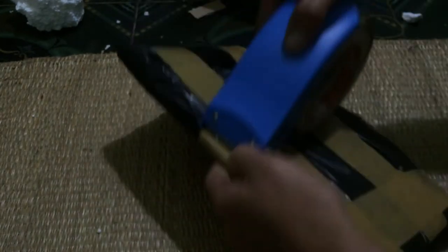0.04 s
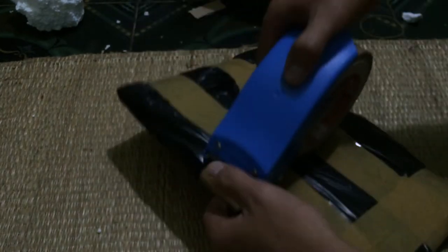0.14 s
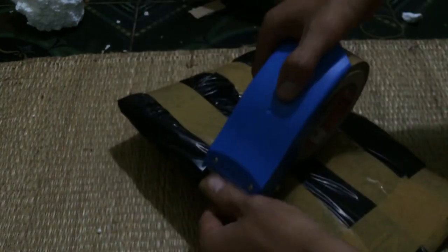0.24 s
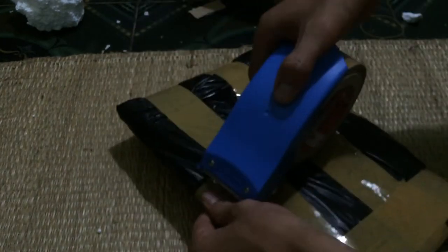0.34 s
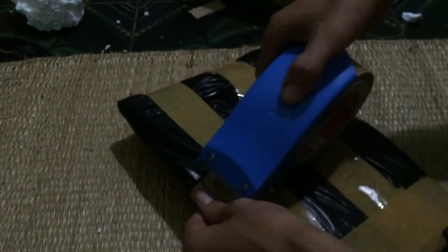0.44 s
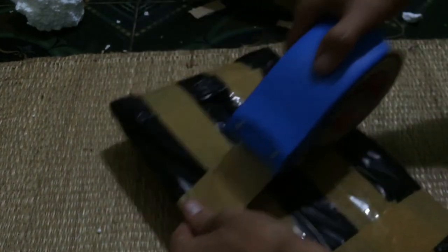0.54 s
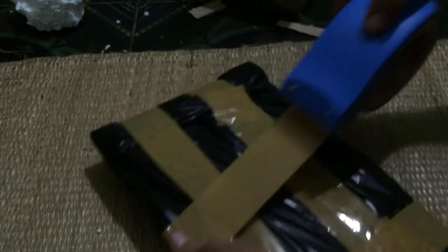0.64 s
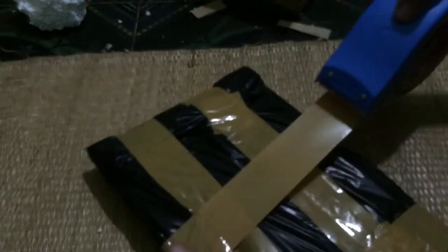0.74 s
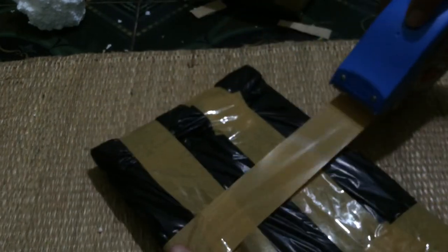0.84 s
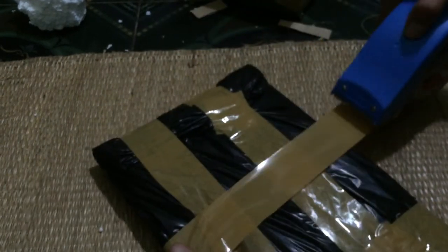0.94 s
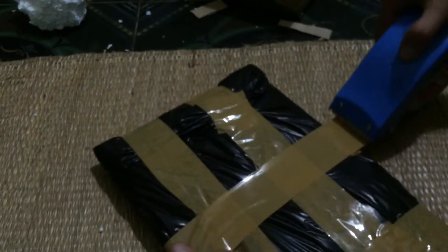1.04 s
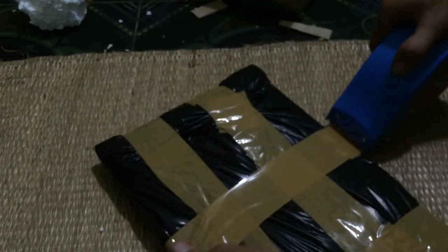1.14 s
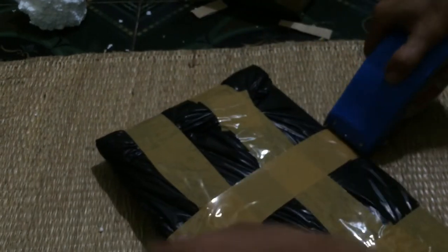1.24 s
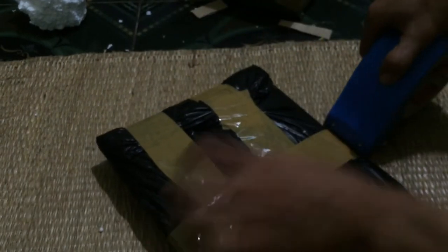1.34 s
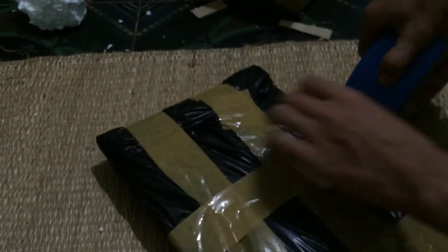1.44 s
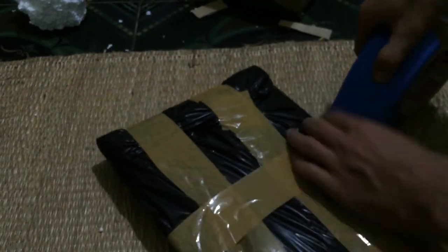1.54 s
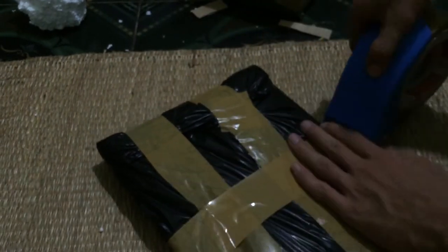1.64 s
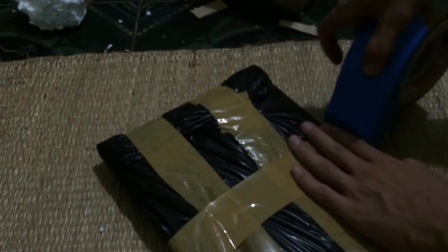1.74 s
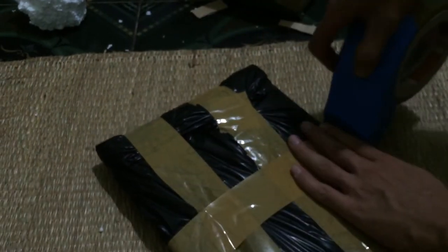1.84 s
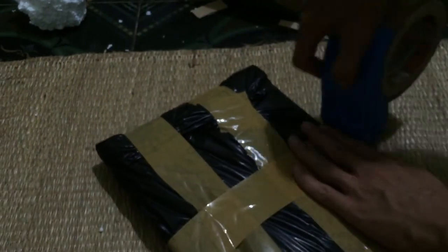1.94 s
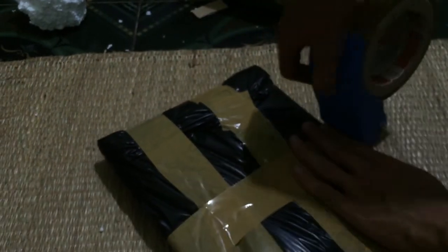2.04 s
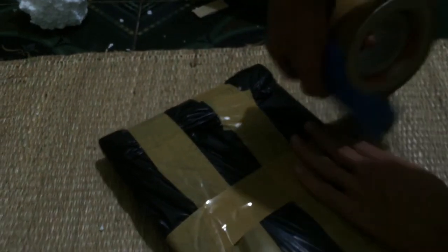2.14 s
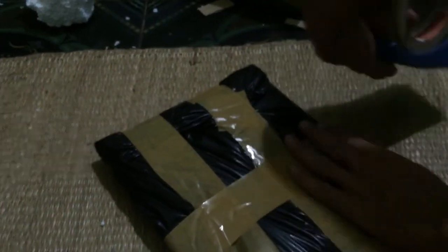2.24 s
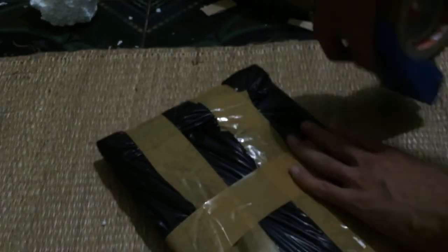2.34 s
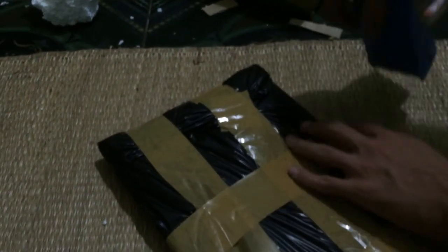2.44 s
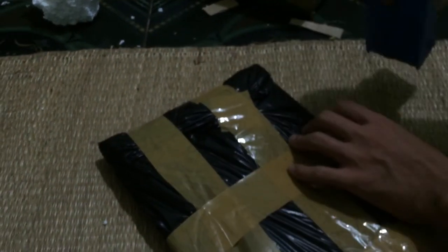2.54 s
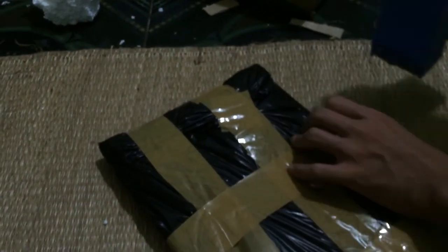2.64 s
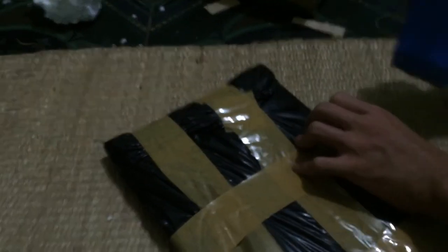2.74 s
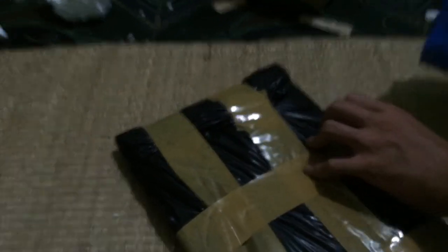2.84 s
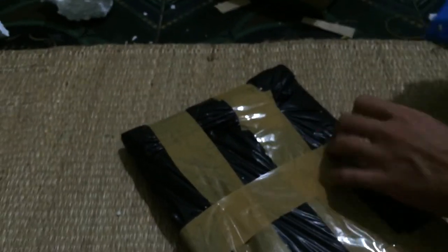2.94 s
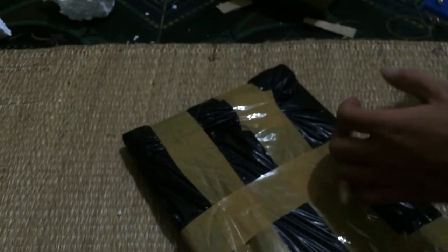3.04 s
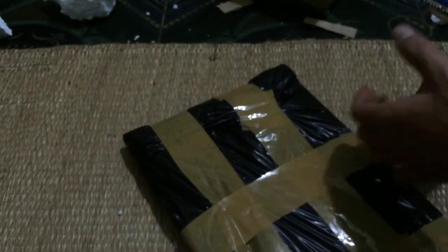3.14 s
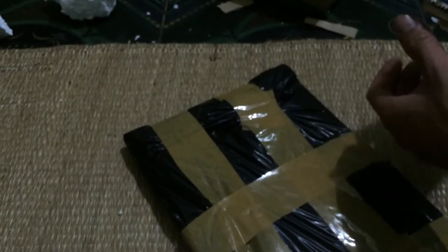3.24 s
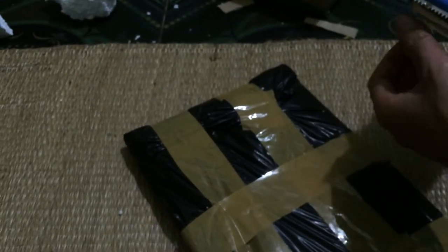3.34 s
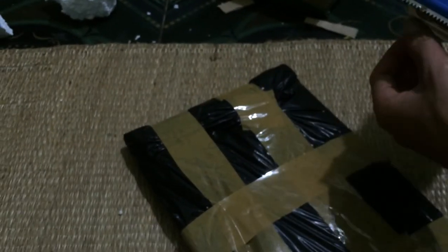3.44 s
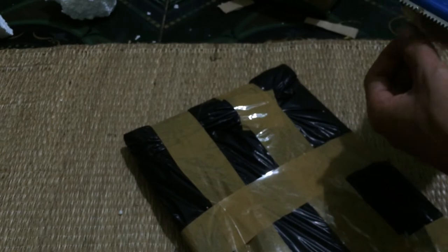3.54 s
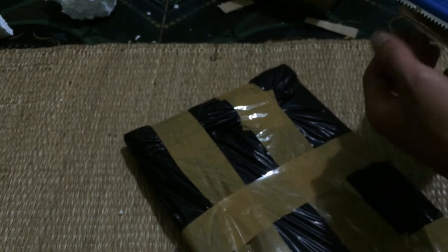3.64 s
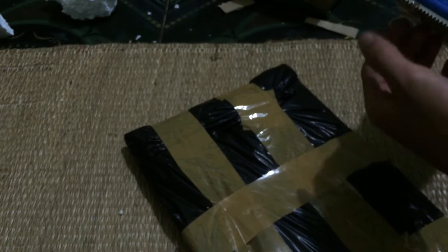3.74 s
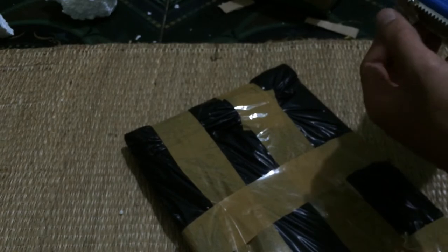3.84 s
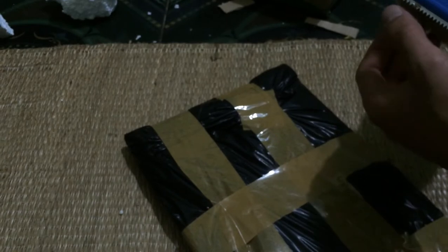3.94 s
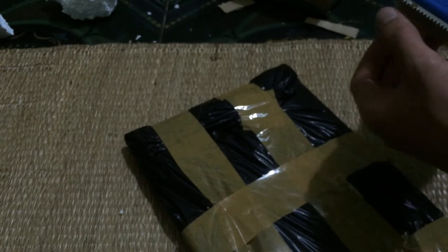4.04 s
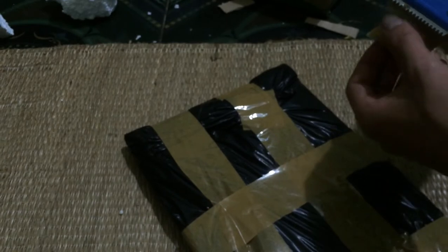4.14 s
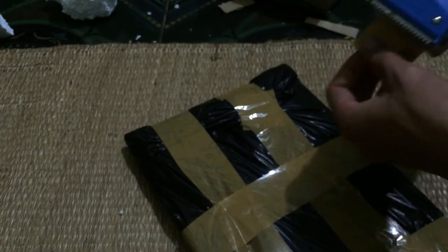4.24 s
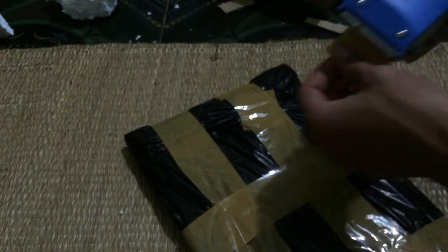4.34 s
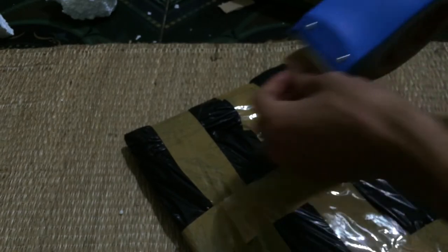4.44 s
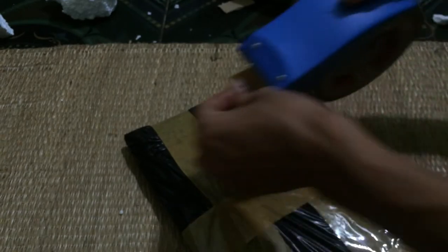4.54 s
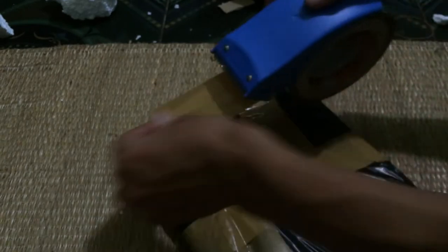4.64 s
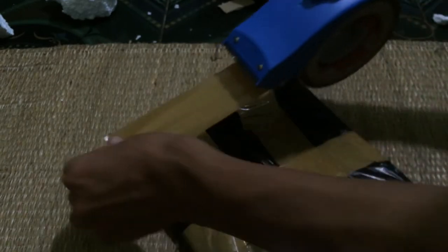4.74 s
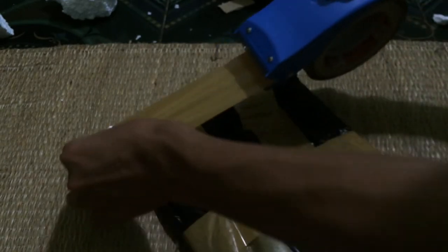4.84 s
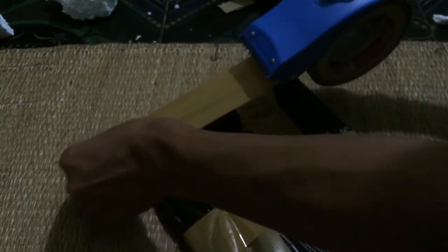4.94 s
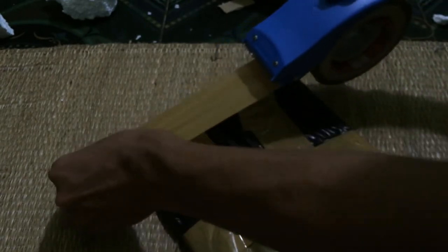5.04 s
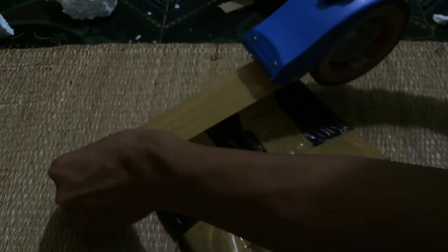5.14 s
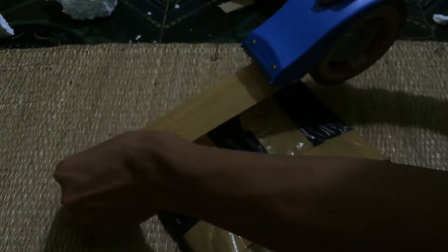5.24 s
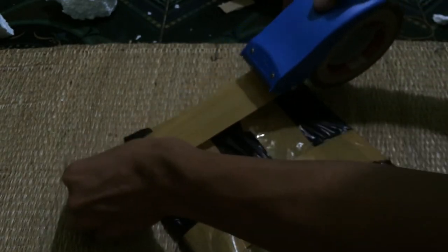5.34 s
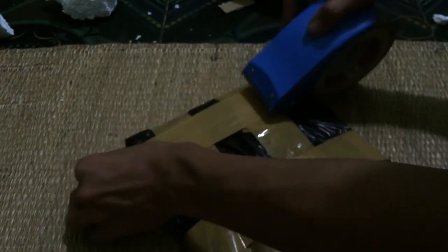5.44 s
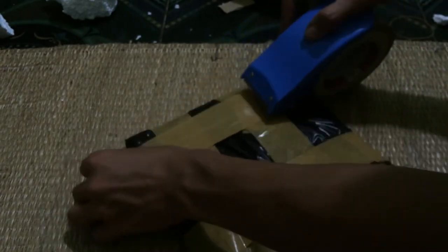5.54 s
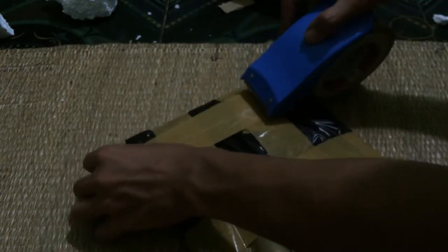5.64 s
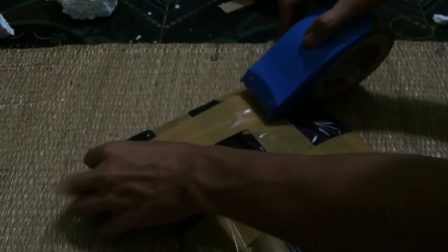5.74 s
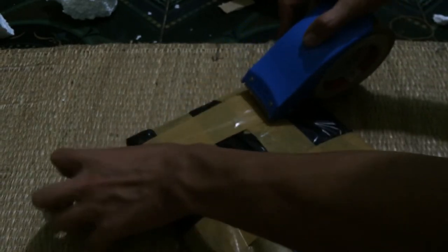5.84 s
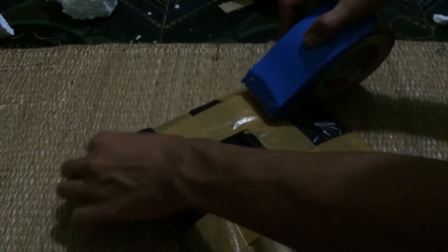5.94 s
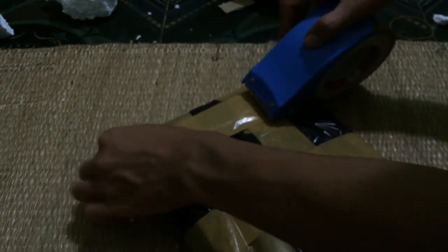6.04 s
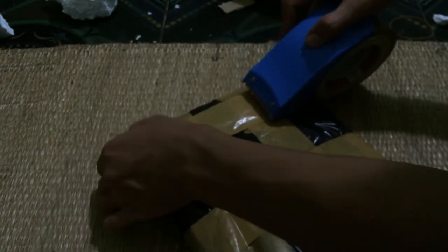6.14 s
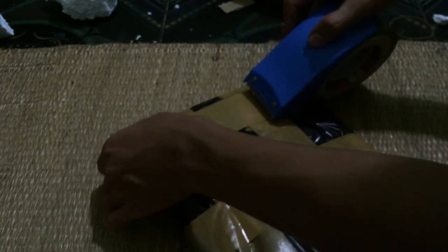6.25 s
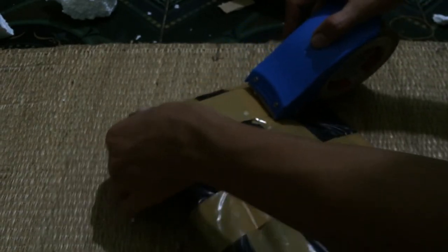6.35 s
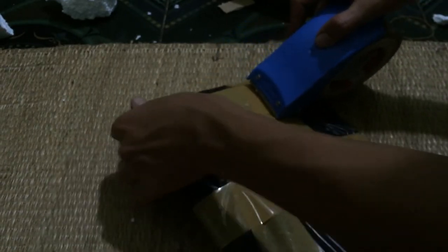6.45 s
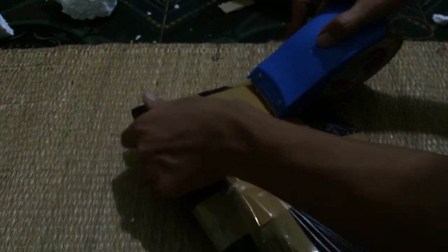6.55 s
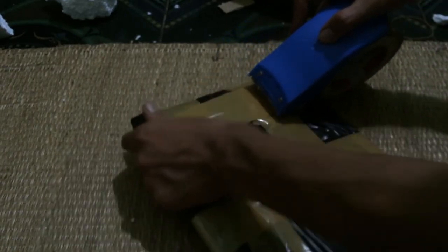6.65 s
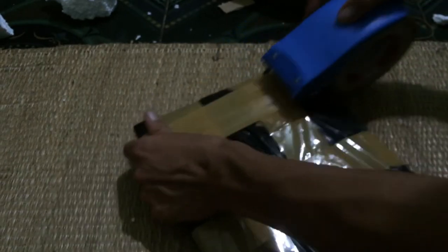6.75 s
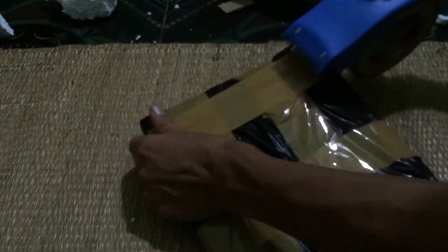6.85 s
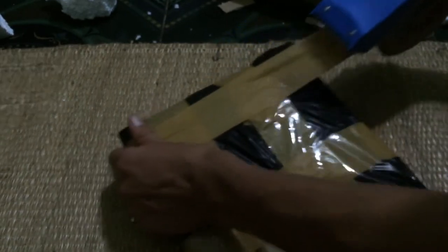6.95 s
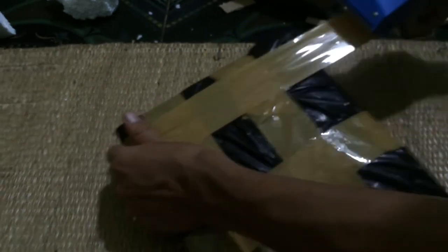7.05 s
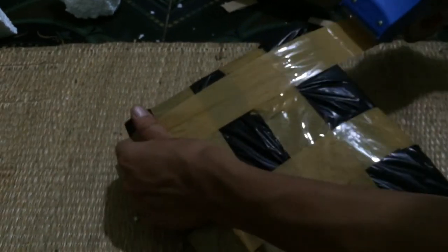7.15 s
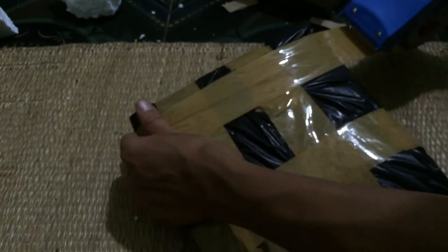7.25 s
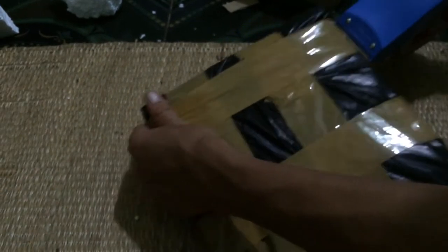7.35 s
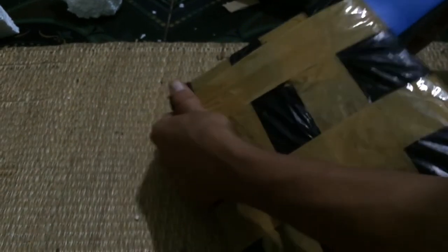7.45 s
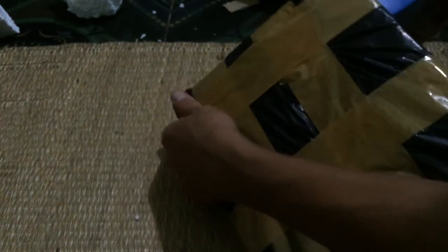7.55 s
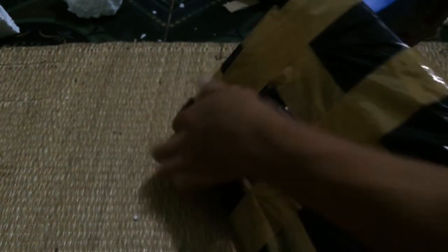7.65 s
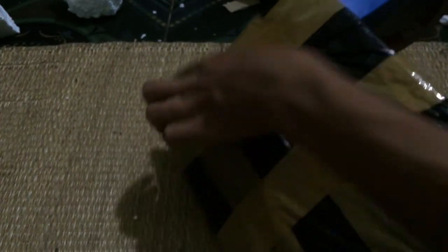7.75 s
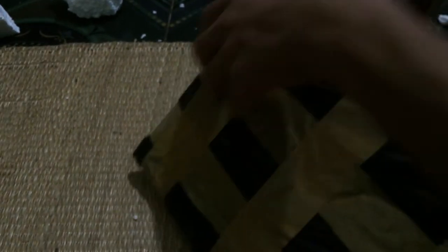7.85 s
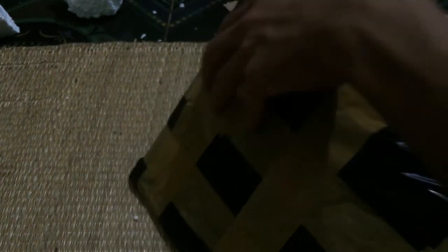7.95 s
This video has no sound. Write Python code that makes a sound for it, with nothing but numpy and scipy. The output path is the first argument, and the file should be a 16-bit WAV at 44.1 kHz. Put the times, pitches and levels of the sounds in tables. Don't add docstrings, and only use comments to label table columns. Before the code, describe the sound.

Packing tape rips loudly off a plastic dispenser in three bursts, with clicks, snaps and crinkling as it is pressed onto a wrapped parcel.

```python
import sys
import numpy as np
from scipy import signal
from scipy.fft import rfft, irfft, next_fast_len
from scipy.io import wavfile
from scipy.ndimage import uniform_filter1d

SR = 44100
rng = np.random.default_rng(int(sys.argv[2]) if len(sys.argv) > 2 else 0)


def persist_wave(psi):
    counts = np.round(np.clip(psi, -1, 1) * 32767).astype(np.int16)
    wavfile.write(sys.argv[1], SR, np.atleast_2d(counts).T)


def to_linear_factor(level_db):
    exponent = np.asarray(level_db, float) / 20
    return 10 ** exponent


N = 351918


def pull(rows, rings, low_db, body_db, treble_db, first_drum_hz, last_drum_hz, sink_s):
    start_s, *columns = np.transpose(rows)
    t = np.arange(start_s[0], start_s[-1] + .012, 1 / SR)
    count = len(t)
    level_db = np.interp(t, start_s, columns[0])
    mid_hz, upper_hz = np.array(columns[1:])[:, np.searchsorted(start_s, t, "right") - 1]
    low_hz = np.linspace(*rings[:2], count)
    *rings_db, steady_per_slip = rings[2:]
    sway = 1 + 0.014 * wander((count, 2), 900).T
    drum_hz = last_drum_hz + (first_drum_hz - last_drum_hz) * np.exp(-(t - start_s[0]) / sink_s)

    slips_per_s = 320 * to_linear_factor(.45 * (level_db + 13))
    steady = np.clip(steady_per_slip * slips_per_s, .2, .9)
    turns = np.cumsum(slips_per_s * to_linear_factor(4.0 * wander(count, 160))) / SR
    slips = np.diff(np.floor(turns), prepend=0) * to_linear_factor(0.35 * rng.standard_normal(count))
    after = signal.lfilter([1], [1, -np.exp(-1 / (0.0019 * SR))], slips)
    chain = evened(after * crackle(count, 9000, 3.4) - 8.5 * slips)
    drive = (1 - steady) * chain + steady * crackle(count, 8700, 2.9)
    drive = drive / running_rms(drive, 1300) * (t < start_s[-1])

    drum = to_linear_factor(-22) * evened(resonate(resonate(drive, drum_hz, 240), drum_hz, 170))
    shell = body(drive + to_linear_factor(-6.0) * resonate(drive, 1440, 160), low_hz, low_db, 200)
    middle, treble = split(film(drive, sway * [mid_hz, upper_hz], rings_db, [150, 450], 2.0))
    tape = evened(middle) + to_linear_factor(treble_db) * evened(treble)
    return start_s[0], to_linear_factor(level_db + 7) * (tape + to_linear_factor(body_db) * (shell + drum))


# start_s, level_db, lower_film_ring_hz, upper_film_ring_hz
PULLS = [
    [(0.551, -14, 4800, 5960), (0.58, -14, 4300, 5100), (0.605, -13, 4500, 5700), (0.64, -15.5, 3950, 5500),
     (0.675, -13.5, 3880, 5500), (0.715, -15, 3600, 5550), (0.752, -16.5, 3080, 4300),
     (0.806, -21, 3280, 5200), (0.885, -26.5, 3500, 5600)],
    [(4.675, -14, 3340, 4700), (4.705, -14.5, 3240, 4430), (4.735, -14.5, 3300, 5050),
     (4.765, -12.5, 3300, 5400), (4.8, -13.5, 3200, 5200), (4.825, -16, 3080, 4440),
     (4.85, -18.5, 3140, 4930), (4.875, -22, 3140, 5100)],
    [(6.928, -14, 3320, 4800), (6.962, -16.5, 3300, 5100), (6.985, -17.5, 2560, 4700),
     (7.04, -17, 2580, 4850), (7.075, -18, 2530, 3540), (7.105, -22, 2420, 4900),
     (7.135, -27.5, 2380, 4700)],
]
# first_low_hz, last_low_hz, lower_film_ring_db, upper_film_ring_db, steady_share_per_slip_a_s
PULL_RINGS = [(800, 690, 5.2, 1.5, 0.002), (1160, 880, 8.1, 3, 0.0016), (1330, 665, 8, -14, 0.0014)]
LOW_RING_DB = [0, 2, 7.5]
# dispenser_db, treble_db (both above film), first_drum_hz, last_drum_hz, sink_s
GRIPS = [(-1, -5.5, 520, 280, 0.19), (-3, -4, 410, 400, 0.13), (3.5, -7, 1000, 157, 0.063)]


def pulls():
    out = np.zeros(N)
    for rows, rings, low_db, grip in zip(PULLS, PULL_RINGS, LOW_RING_DB, GRIPS):
        add(out, *pull(rows, rings, low_db, *grip))
    return out


# start_s, film_db, treble_above_film_db, length_s, film_ring_hz
SLIPS = [(0.4927, -7.5, -7, 0.0017, 3180), (0.4976, -6, -6, 0.0022, 3500), (0.505, -4.5, -5, 0.0024, 3300),
         (0.5112, -6, -5, 0.0022, 3280), (0.519, -2.5, -5, .004, 5800), (0.5273, -2.5, -9, 0.003, 3000),
         (0.534, -5, -6, .003, 5500), (0.5418, -4, -8, 0.0052, 3500), (0.5498, 0, -9, 0.0025, 5500),
         (0.556, -11, -12, 0.0018, 5000), (0.563, -5, -10, 0.0024, 6000), (0.878, -16, 5, 0.0023, 5540),
         (4.63, -6, -1, 0.0042, 4300), (4.6526, -5, -3, 0.0045, 4500), (4.6562, -3.5, -5, 0.0066, 3550),
         (4.661, -4, -6, 0.0054, 4200), (4.6755, -6, -2, 0.0045, 5000), (4.898, -9.5, -20, 0.0033, 5260),
         (5.0076, -8, -1.5, 0.0044, 5100), (5.0408, -7.5, -2, 0.0028, 5130),
         (5.046, -7.5, -9, 0.0061, 3580), (5.078, -2, -7, 0.0028, 5000), (5.1021, -3, -9, 0.0019, 4000),
         (5.1383, -5.5, -3.5, 0.0031, 4200), (6.8534, -4.5, -14, 0.00078, 3500),
         (6.8585, -6.5, -13, 0.0019, 5000), (6.8634, -10, -11, 0.0031, 4000),
         (6.869, -13, -5, 0.0067, 5000), (6.8953, -9.5, -8, 0.0012, 5500),
         (6.9013, -4.5, -15, 0.0012, 4260), (6.9056, -4, -18, 0.0022, 4400),
         (6.911, -5.5, -9, 0.0015, 5000), (6.926, -6, -17, 0.0046, 4500), (7.109, -15, -3, 0.0017, 5000),
         (7.122, -23, 2, .002, 4500)]
# time_s, dispenser_above_film_db
SLIP_BODY = [(0.5, -1.5), (5.0, -1), (6.9, 0.5)]


def slips():
    out = np.zeros(N)
    for start_s, film_db, treble_db, *shape in SLIPS:
        body_db = np.interp(start_s, *np.transpose(SLIP_BODY))
        add(out, start_s, snap(film_db, body_db, treble_db, *shape, crack=3.0, rise_s=0.00012,
                               ring_hz=1321, ring_db=5.5, parcel_db=-17.0, bend=1.1))
    return out


# start_s, film_db, dispenser_above_film_db, length_s, film_ring_hz
CUTS = [(1.7195, -36.5, -7, 0.0034, 6030), (1.7292, -21.5, -4.5, 0.0047, 5500),
        (1.7406, -16.5, -4, 0.0096, 6500), (1.763, -17.5, -12, 0.011, 3200), (1.772, -24, -9, 0.0075, 3200),
        (1.781, -18, -9.5, 0.0043, 3300), (2.1005, -20, -12, 0.0011, 7500),
        (2.1525, -12.5, -14.5, 0.0021, 4500), (2.1593, -20, -15, 0.0028, 6500),
        (2.1718, -9.5, -12, 0.0027, 4200), (2.1867, -22, -5, .002, 6500),
        (2.1916, -5.5, -6.5, 0.0076, 4400), (2.1967, -4.5, -11, .003, 4430),
        (2.1995, -3.5, -4.5, 0.005, 6900)]


def cuts():
    out = np.zeros(N)
    for start_s, film_db, body_db, *shape in CUTS:
        add(out, start_s, snap(film_db, body_db, -0.5, *shape, crack=7.0, rise_s=0.0001,
                               ring_hz=1390, ring_db=3.5, parcel_db=-9, bend=0.87))
    return out


# start_s, film_db, dispenser_above_film_db, treble_above_film_db, length_s
TEARS = [(1.588, -39, 1.5, 0.5, 0.019), (1.743, -19, 1.5, 7.5, 0.0028), (1.776, -31.5, 7.5, 10, 0.0035),
         (3.603, -42.5, -1, 6, 0.0067), (3.9625, -43, -0.5, -2, 0.0067), (4.302, -35.5, 2, -0.5, 0.0039),
         (4.6277, -12, -7, 0, 0.0032), (4.894, -9, -0.5, -0.5, 0.002), (5.561, -52, 10, 7.5, 0.011),
         (5.8336, -29.5, -11, -2.5, 0.025), (6.206, -22.5, 1.5, -6, 0.0051), (6.742, -29.5, 2, -3, 0.0036),
         (6.754, -24.5, 2, -1, 0.0062), (6.7657, -18.5, 0.5, -3, 0.0055), (6.78, -4.5, -1.5, -7.5, 0.0022)]


def tears():
    out = np.zeros(N)
    for start_s, *shape in TEARS:
        add(out, start_s, snap(*shape, film_hz=4700, crack=0, rise_s=0.0036,
                               ring_hz=1410, ring_db=10.5, parcel_db=-7))
    return out


def snap(film_db, body_db, treble_db, length_s, film_hz, crack, rise_s, ring_hz, ring_db, parcel_db, bend=0.79):
    t = np.arange(1600) / SR
    decay = np.exp(-(t / np.clip(length_s, .0004, .02)) ** bend)
    drive = crackle(len(t), 15000, 3.3) * decay * np.minimum(t / rise_s, 1)
    drive[0] -= crack
    shell = body(drive, ring_hz, ring_db, parcel_db=parcel_db)
    middle, treble = split(film(drive, [film_hz], [1.5], [1100], 0))
    out = np.zeros(len(t))
    for part, db in ((shell, body_db), (middle, 0), (treble, treble_db)):
        out += to_linear_factor(film_db + db) * part / running_rms(part, 130).max()
    return out


# start_s, film_db, body_above_film_db, body_hz
TAPS = [(0.0432, -41, 12, 1790), (0.2274, -40, -2, 1270), (1.26, -38, 3, 600), (2.7337, -45, 4, 951),
        (2.788, -35, 3.5, 2400), (2.9214, -31, -38, 1850), (2.951, -28, -6.5, 926), (3.051, -37, -22, 1690),
        (3.0685, -31, -21.5, 1344), (3.1581, -36.5, -9, 2010), (3.3816, -40, -6, 1647),
        (3.765, -51, 4.5, 800), (4.3964, -22.5, -9, 850), (5.9373, -30.5, 12, 1260), (6.113, -52, 13, 1200),
        (6.333, -28.5, -0.5, 1210), (6.7123, -49, 7, 1600), (7.4995, -56, 26.5, 720),
        (7.5295, -52, 22, 1000), (7.5649, -27.5, -10, 1030), (7.5766, -33, 2, 1600), (7.635, -47, 12, 1100),
        (7.6885, -36, 4.5, 1520), (7.7069, -32.5, -4, 1990), (7.7773, -34.5, -21, 1690),
        (7.854, -32, 1.5, 1620)]
# start_s, peak_db, film_ring_hz, body_above_film_db
CREASES = [(0.1054, -28, 2630, -11), (1.6075, -30, 2230, -10), (1.711, -24.5, 3210, -4),
           (1.8185, -21, 4100, -12), (2.0107, -37, 5910, -12), (2.0451, -34, 5140, -12),
           (2.0733, -33, 4140, -12), (2.4314, -32, 3060, -10), (2.4574, -31, 4080, -7),
           (2.5072, -36, 4340, -11), (2.635, -32, 3730, -4), (2.797, -34, 2110, -4),
           (2.912, -37, 3860, -16), (2.9364, -36, 4020, -12.5), (2.9623, -32, 4130, -8),
           (3.059, -34, 3810, -12), (3.5758, -40, 6050, -8.5), (3.8286, -35.5, 5400, -12),
           (4.022, -43.5, 2840, -10), (4.075, -37, 6210, -11.5), (4.1093, -32.5, 5880, -10),
           (4.134, -35.5, 6080, -13), (4.1544, -43.5, 6290, -14.5), (4.2327, -30, 5870, -12.5),
           (4.2417, -26, 5870, -11), (4.2516, -29, 5800, -11), (4.3535, -44, 3980, -14),
           (4.4036, -20.5, 4200, -7), (4.4462, -10.5, 5040, -9), (5.745, -32, 5610, -13),
           (5.7636, -30.5, 4980, -17), (5.8073, -30, 5100, -14), (5.8189, -26, 5080, -13),
           (5.8456, -15.5, 5310, -5), (5.859, -14, 5110, -2.5), (5.8942, -23, 5210, -3),
           (5.9813, -30, 2420, -14), (5.988, -29, 2400, -12), (6.014, -25.5, 5060, -19),
           (6.0733, -25.5, 2440, -23), (6.138, -40, 2410, -12), (6.1516, -26.5, 1990, -3),
           (6.184, -20.5, 2410, -10), (6.4826, -23.5, 4960, -6), (6.5016, -28, 4580, -15),
           (6.528, -33, 3720, -12)]


def fingers():
    out = np.zeros(N)
    for start_s, film_db, body_db, hz in TAPS:
        add(out, start_s, snap(film_db, body_db, -16.5, length_s=0.0033, film_hz=3800, crack=8.2,
                               rise_s=0.00015, ring_hz=hz, ring_db=15.0, parcel_db=6.0))
    for start_s, peak_db, hz, body_db in CREASES:
        add(out, start_s, snap(peak_db - 8, body_db, 0.5, length_s=0.0012, film_hz=hz, crack=7.0,
                               rise_s=0.00024, ring_hz=1470, ring_db=13.5, parcel_db=9.5))
    return out


# start_s, level_db, ring_hz, length_s
KNOCKS = [(0.251, -22, 1310, 0.0039), (0.324, -23.5, 1220, 0.0053), (0.417, -20.5, 1265, 0.0028),
          (2.492, -31.5, 845, 0.0077), (2.773, -42.5, 597, 0.0087), (2.858, -40, 666, 0.0086),
          (2.876, -40, 560, 0.008), (2.931, -42, 600, 0.0035), (2.977, -40, 659, 0.00396),
          (4.472, -29, 1430, 0.0096), (6.309, -28, 1470, 0.013), (6.615, -32.5, 1240, 0.0049),
          (7.895, -32, 1400, 0.0092)]


def knocks():
    out, t = np.zeros(N), np.arange(1600) / SR
    for start_s, level_db, hz, length_s in KNOCKS:
        blow = crackle(len(t), 3600, 2.0) * 0.3 * np.exp(-t / length_s)
        blow[[0, round(length_s * SR)]] += [1, .55]
        ring = resonate(resonate(blow, hz, 290), hz, 520)
        ring = ring + to_linear_factor(-24.5) * body(blow, 2300, 4.0) * np.std(blow)
        add(out, start_s, to_linear_factor(level_db + 6.5) * ring / abs(ring).max())
    return out


# start_s, end_s, first_db, last_db, body_rustle_above_it_db
HANDLING = [(0, 0.326, -47.5, -64, 5.5), (0.302, 0.508, -57, -64, 6.5), (1.195, 1.385, -49.5, -60.5, 1),
            (1.603, 1.995, -53, -75, 7), (2.056, 2.155, -55, -41.5, -1.5), (2.307, 2.595, -71, -51.5, -2),
            (2.599, 2.844, -72.5, -59, 7), (2.82, 2.923, -61, -67, 10.5), (2.899, 3.12, -49.5, -65.5, 0.5),
            (3.103, 3.6, -61.5, -71.5, -11), (4.153, 4.52, -78.5, -54, 1.5),
            (4.563, 4.641, -56, -37.5, -15), (5.501, 5.816, -51, -83, 6), (5.801, 6.413, -81, -52.5, 5),
            (6.397, 6.783, -51, -64.5, -3), (7.439, 8.1, -46.5, -59.5, -0.5)]


def handling():
    out = np.zeros(N)
    for start_s, end_s, first_db, last_db, body_db in HANDLING:
        count = round((end_s - start_s) * SR)
        clumps = to_linear_factor(5.0 * wander((count, 2), 700)).T
        drive = clumps * crackle(count, 3000, 1.9) * signal.windows.tukey(count, .45)
        rustle = to_linear_factor(body_db) * body(drive[1], 1450, 15.6, 790, 14.4)
        crinkle = film(drive[0], [4500], [-21], [330], 5.0)
        add(out, start_s, to_linear_factor(np.linspace(first_db, last_db, count)) * (crinkle + rustle))
    return out


# start_s, end_s, level_db, lower_hz, upper_hz
CREAKS = [(.471, .493, -39, 4200, 2600), (4.6, 4.63, -36.5, 1370, 4700), (6.705, 6.745, -43.5, 1370, 2250),
          (6.3, 6.345, -56, 460, 1800), (3.82, 3.86, -55, 1400, 1720), (2.09, 2.15, -44.5, 3100, 6100),
          (5.79, 5.875, -49.5, 5400, 1700), (1.8, 1.99, -61.5, 1150, 1500), (6.22, 6.3, -58, 700, 1900),
          (0.057, 0.164, -47.5, 1100, 2850)]


def creaks():
    out = np.zeros(N)
    for start_s, end_s, level_db, low_hz, high_hz in CREAKS:
        drive = crackle(round((end_s - start_s) * SR), 7100, 2.5)
        rings = resonate(drive, low_hz, 450) - resonate(drive, high_hz, 500) + 0.14 * drive
        fade = signal.windows.tukey(len(drive), .3)
        add(out, start_s, to_linear_factor(level_db) * evened(passed(rings, 350, "high")) * fade)
    return out


# centre_s, signed_height, width_s
PUFFS = [(0.067, .01, 0.0013), (.73, .015, 0.0028), (1.794, .015, 0.0014), (2.196, .03, 0.0012),
         (4.824, -0.62, 0.0011), (4.858, 1, 0.00029), (4.866, 0.23, 0.0016), (4.8618, -0.55, 0.0011),
         (5.01, -0.0074, .004), (5.05, -0.017, 0.0016), (5.102, 0.0056, 0.0036), (5.14, -0.00085, 0.0033),
         (5.864, .02, 0.00065), (7.119, .02, 0.0031), (7.656, .008, 0.0026)]


def puffs():
    out, t = np.zeros(N), np.arange(-400, 400) / SR
    for centre_s, height, width_s in PUFFS:
        add(out, centre_s - 400 / SR, height * np.exp(-abs(t) / width_s - (t / (2 * width_s)) ** 2))
    return signal.sosfilt(signal.butter(3, 48, "high", fs=SR, output="sos"), out)


# start_s, end_s, level_db
RUMBLES = [(0, .4, -62.5), (1.55, 2.0, -64), (4.253, 4.5, -63), (5.098, 5.244, -63), (7.45, 8.0, -61.5)]


def rumbles():
    out = np.zeros(N)
    for start_s, end_s, level_db in RUMBLES:
        count = round((end_s - start_s) * SR)
        low = passed(rng.standard_normal(count), 190, "low") * to_linear_factor(5.0 * wander(count, 1500))
        add(out, start_s, to_linear_factor(level_db) * evened(low) * signal.windows.tukey(count, .4))
    return out


# start_s, end_s, pitch_hz, level_db
DRONES = [(0, 0.437, 215, -61.5), (.9, 1.56, 178.3, -65.5), (.9, 1.52, 431, -71), (2.2, 2.49, 180.4, -62),
          (6.84, 6.95, 188, -51), (4.35, 4.503, 174, -62)]


def drones():
    out = np.zeros(N)
    for start_s, end_s, hz, level_db in DRONES:
        hiss = rng.standard_normal(round((end_s - start_s) * SR))
        tone = evened(resonate(resonate(hiss, hz, 14.0), hz, 14.0))
        add(out, start_s, to_linear_factor(level_db) * tone * signal.windows.tukey(len(hiss), .3))
    return out


# freq_hz, density_db_per_hz
FLOOR = [(18, -30.5), (30, -20), (64, -7.5), (141, -5), (569, -18.5), (1100, -14), (3060, -22), (4780, -20),
         (5900, -20.5), (7270, -5.5), (8520, -26), (14800, -24.5), (16000, -59)]


def background():
    hush, shrill, low = rng.standard_normal((3, N))
    colour = to_linear_factor(read(FLOOR, np.fft.rfftfreq(N, 1 / SR)))
    hush = to_linear_factor(-60.5) * evened(irfft(rfft(hush) * colour, N))
    z = signal.stft(hush, nperseg=512)[2]
    patches = uniform_filter1d(rng.standard_normal(z.shape[::-1]).T, size=9, axis=0)
    patches = evened(uniform_filter1d(patches, size=12, axis=1))
    hush = signal.istft(z * to_linear_factor(3 * patches), nperseg=512)[1][:N]
    insects = to_linear_factor(-62.5) * evened(resonate(resonate(shrill, 7200, 600), 7200, 600))
    hum = to_linear_factor(-72) * evened(resonate(resonate(low, 57.8, 9.0), 57.8, 9.0))
    return hush + insects + hum


# freq_hz, t60_s
ROOM = [(250, 0.69), (800, 1.086), (1700, 1.01), (4500, 0.83), (12000, 0.58)]
# freq_hz, gain_db
ROOM_COLOUR = [(200, 2), (900, 0.5), (1200, 1), (1480, 3), (1800, 1.5), (2400, 1.5), (5000, -2),
               (12000, -2)]
# freq_hz, width_hz, level_db
ROOM_RINGS = [(701, 40, -2.5), (953, 50, 4), (1110, 61, -2), (1370, 66, -0.5), (1520, 50, 4), (2400, 86, 2)]


def room(near, pull_track):
    hz, t, z = signal.stft(rng.standard_normal(3 * SR // 2), SR, nperseg=256)
    z = z * to_linear_factor(read(ROOM_COLOUR, hz)[:, None] - 60 * t / read(ROOM, hz)[:, None])
    tail = signal.istft(z, SR, nperseg=256)[1]
    tail = tail * (1 - np.exp(-(np.arange(len(tail)) / (0.0045 * SR)) ** 2))
    rung = sum(to_linear_factor(db) * resonate(pull_track, ring_hz, width) for ring_hz, width, db in ROOM_RINGS)
    wet = signal.fftconvolve(blurred(near, 120) + rung, tail / np.linalg.norm(tail))[:N]
    return passed(wet, 1900, "low") + blurred(passed(wet, 1900, "high"), 170)


def blurred(x, spread_hz):
    phase = 2 * np.pi * np.cumsum(spread_hz * wander(N, 90)) / SR
    return (signal.hilbert(x, next_fast_len(N))[:N] * np.exp(1j * phase)).real


def crackle(count, per_s, spread_db):
    chance, size, sign = rng.random((count, 3)).T
    heights = to_linear_factor(-spread_db * np.log(size + 0.0031)) * np.sign(sign - .5)
    return evened((chance < per_s / SR) * heights)


def read(points, hz):
    f, value = np.transpose(points)
    return np.interp(np.log(hz + 1), np.log(f + 1), value)


def causal(points, size=1024):
    gain_db = np.maximum(read(points, abs(np.fft.fftfreq(size, 1 / SR))), -45)
    log_gain = np.log(to_linear_factor(gain_db))
    return np.fft.ifft(np.exp(np.conj(signal.hilbert(log_gain)))).real[:size // 4]


# freq_hz, density_db_per_hz
FILM = [(1060, -21.5), (1800, 1), (3060, -1), (3320, -1), (3510, -0.5), (5440, -1.5), (7840, -3),
        (14700, -5.5), (15600, -13), (16000, -63)]
FILM_TAPS = causal(FILM)


def film(drive, rings_hz, rings_db, widths_hz, patchy_db):
    wide = np.convolve(drive, FILM_TAPS)[:len(drive)]
    out = wide.copy()
    swells = to_linear_factor(patchy_db * wander((len(drive), len(rings_hz)), 900)).T
    for hz, db, width, swell in zip(rings_hz, rings_db, widths_hz, swells):
        out += to_linear_factor(db) * swell * resonate(wide, hz, width)
    return evened(out)


# freq_hz, width_hz, level_db
BODY = [(747, 99, 1), (915, 75, 6.5), (1091, 62, 4.5), (1420, 49, 4), (1600, 220, -2), (2344, 58, 3)]


def body(drive, ring_hz, ring_db, width_hz=220, parcel_db=-40):
    rings = to_linear_factor(ring_db) * resonate(drive, ring_hz, width_hz)
    for k, (hz, width, db) in enumerate(BODY):
        rings = rings + (-1) ** k * to_linear_factor(db) * resonate(drive, hz, width)
    thud = to_linear_factor(parcel_db) * resonate(resonate(drive, 580, 490), 580, 490)
    return evened(passed(rings, 550, "high") + thud)


def resonate(x, hz, width_hz):
    r = np.exp(-np.pi * width_hz / SR)
    if np.ndim(hz) == 0:
        return 2 * signal.lfilter([1 - r], [1, -r * np.exp(2j * np.pi * hz / SR)], x).real
    turn = np.exp(2j * np.pi * np.cumsum(hz) / SR)
    return 2 * (turn * signal.lfilter([1 - r], [1, -r], x / turn)).real


def split(x):
    middle = np.convolve(x, signal.firwin(31, 7000, fs=SR), "same")
    return middle, x - middle


def passed(x, hz, kind):
    return signal.sosfilt(signal.butter(4, hz, kind, fs=SR, output="sos"), x)


def evened(x):
    return x / np.sqrt(np.mean(x ** 2) + 1e-20)


def wander(shape, size):
    return evened(uniform_filter1d(rng.standard_normal(shape), size=size, axis=0))


def running_rms(x, size):
    return np.sqrt(abs(uniform_filter1d(x ** 2, size=size)))


def add(mix, start_s, sound):
    part = mix[round(start_s * SR):][:len(sound)]
    part += sound[:len(part)]


def scene():
    pull_track = pulls()
    near = pull_track + slips() + cuts() + tears() + fingers() + knocks()
    near = passed(near, 170, "high")
    mono = to_linear_factor(-7.0) * near + to_linear_factor(-20.5) * room(near, pull_track)
    mono = mono + handling() + creaks() + puffs() + rumbles() + drones() + background()
    return np.array([mono, mono])


def ducking(power_db, knee_db, share, db_per_s):
    fall = np.arange(N) * db_per_s / SR
    held_db = np.maximum.accumulate(power_db + fall) - fall
    return share * np.maximum(held_db - knee_db, 0)


def top_cut(x):
    return signal.sosfilt(signal.butter(12, 16460, fs=SR, output="sos"), x)


def record(dry):
    power_db = 10 * np.log10(abs(uniform_filter1d(dry[0] ** 2, size=300)) + 1e-12)
    quick_db = ducking(power_db, knee_db=-10.5, share=0.39, db_per_s=110)
    slow_db = ducking(uniform_filter1d(power_db, size=4000), knee_db=-29.5, share=0.045, db_per_s=27)
    ducked = dry / to_linear_factor(uniform_filter1d(quick_db + slow_db, size=150))
    rounded = .95 * ducked / (1 + abs(ducked) ** 4) ** (1 / 4)
    limited = signal.oaconvolve(rounded, signal.firwin(255, 15500, fs=SR)[None], "same")
    return top_cut(limited)


dry = scene()
out = record(dry)
persist_wave(out)
```